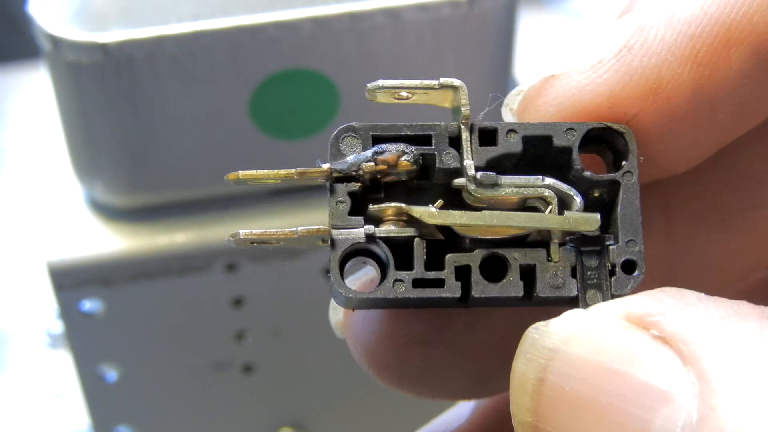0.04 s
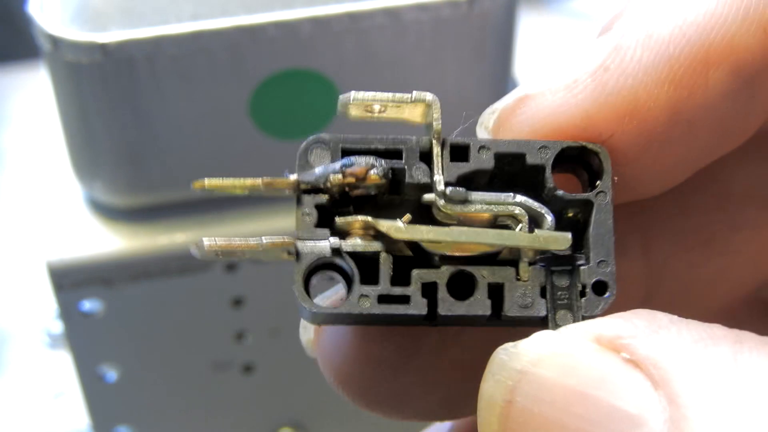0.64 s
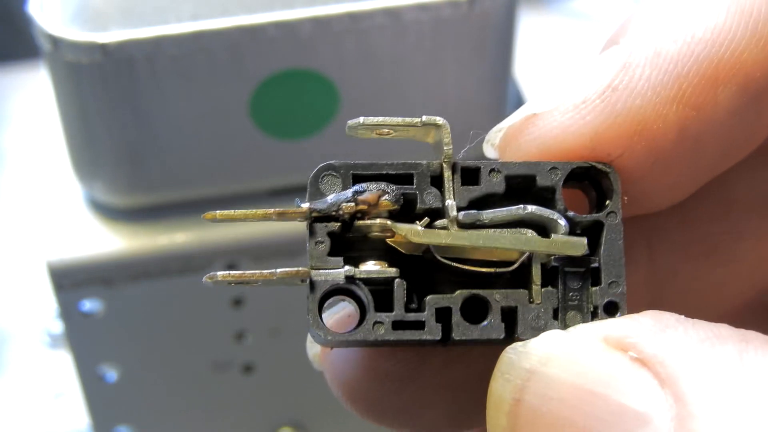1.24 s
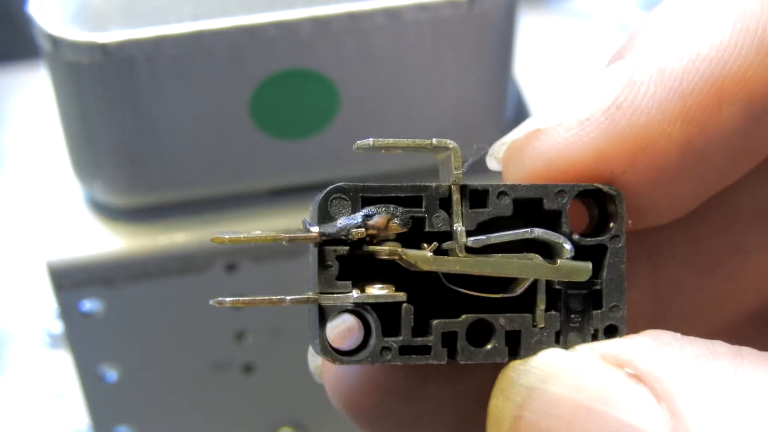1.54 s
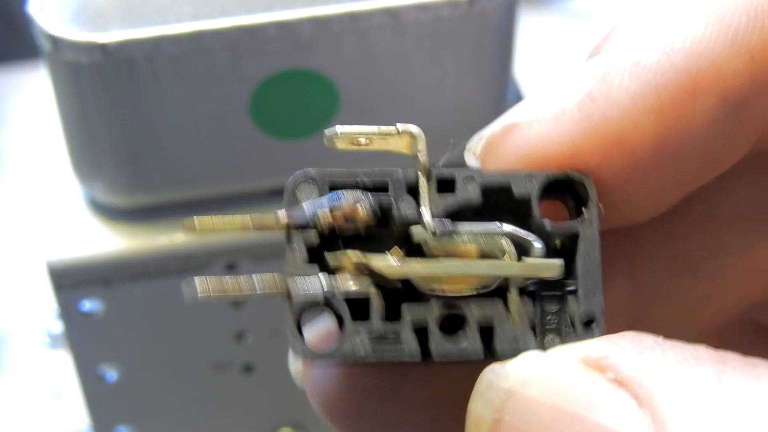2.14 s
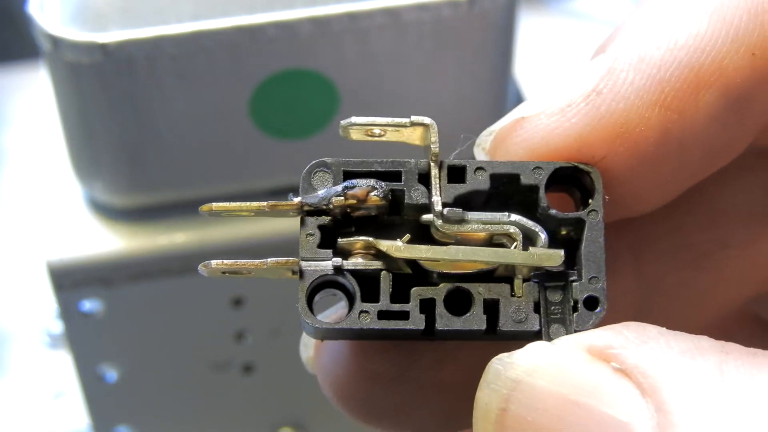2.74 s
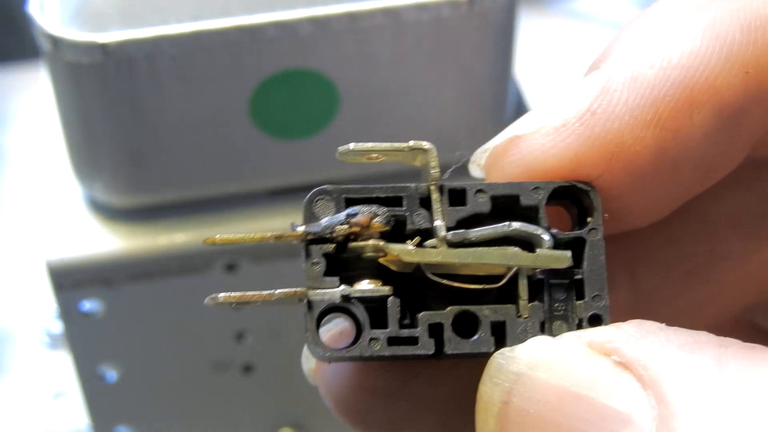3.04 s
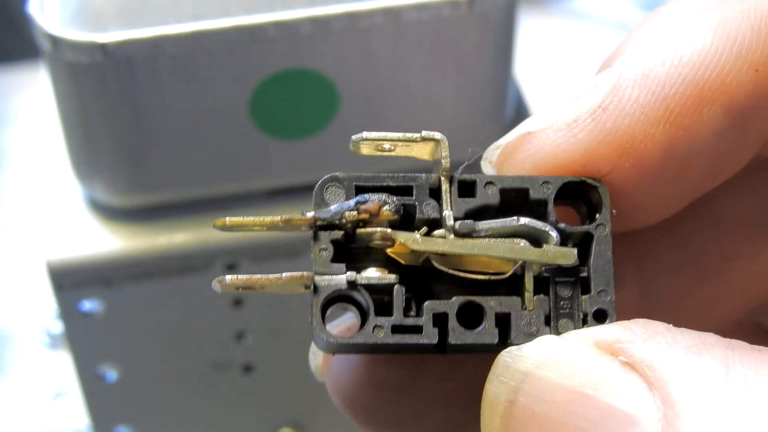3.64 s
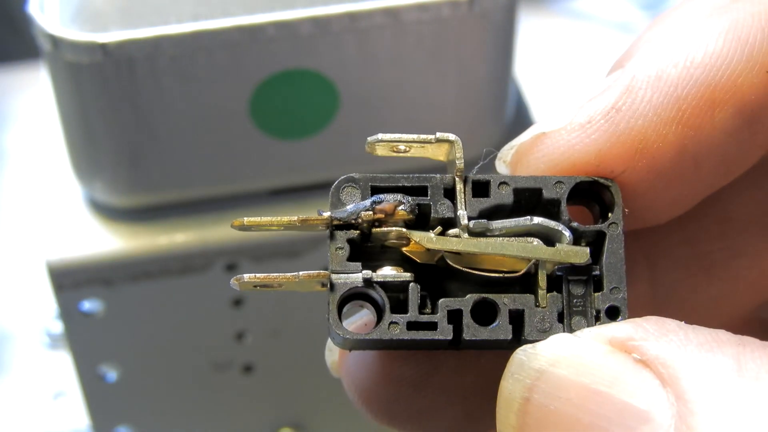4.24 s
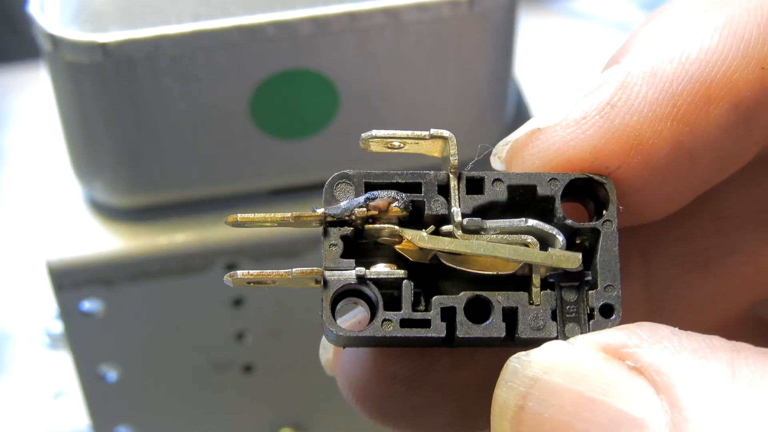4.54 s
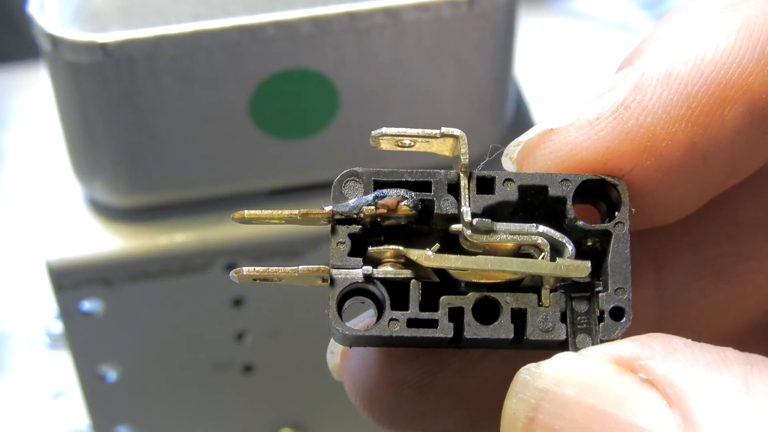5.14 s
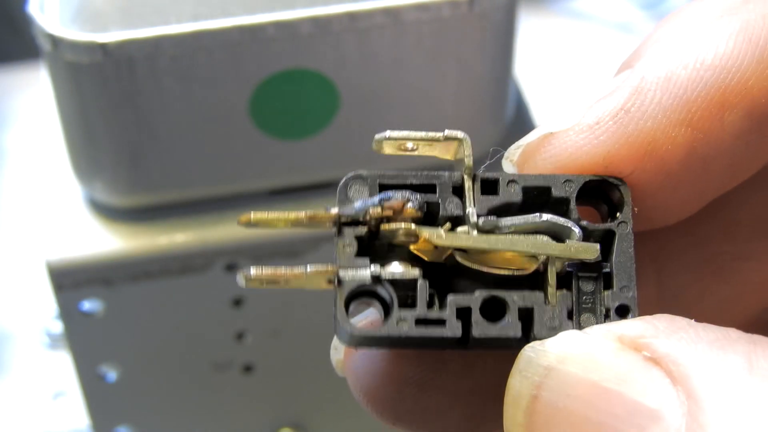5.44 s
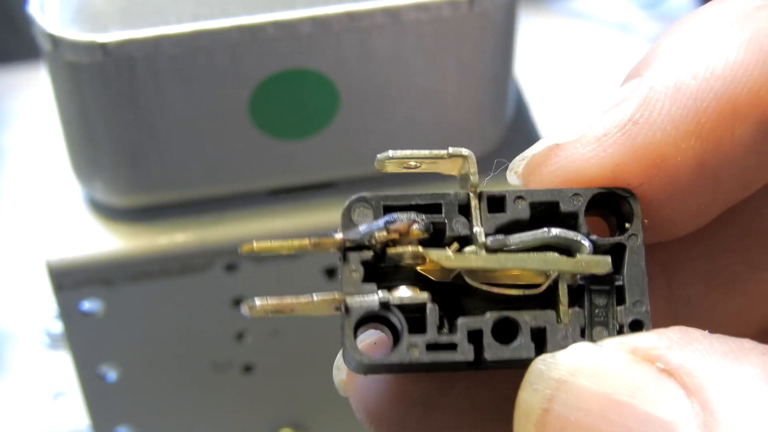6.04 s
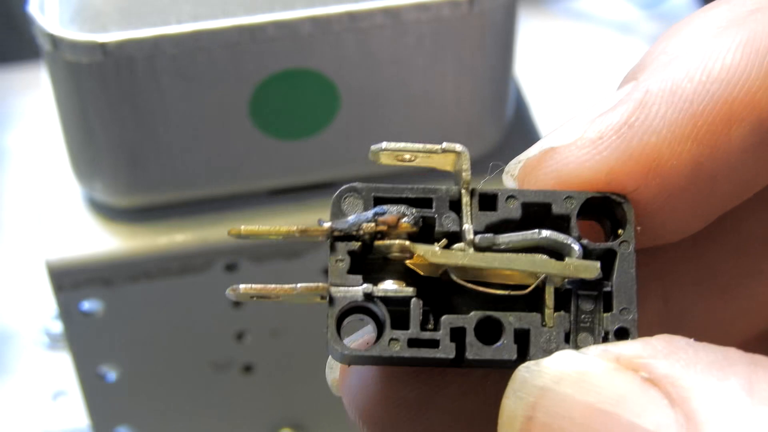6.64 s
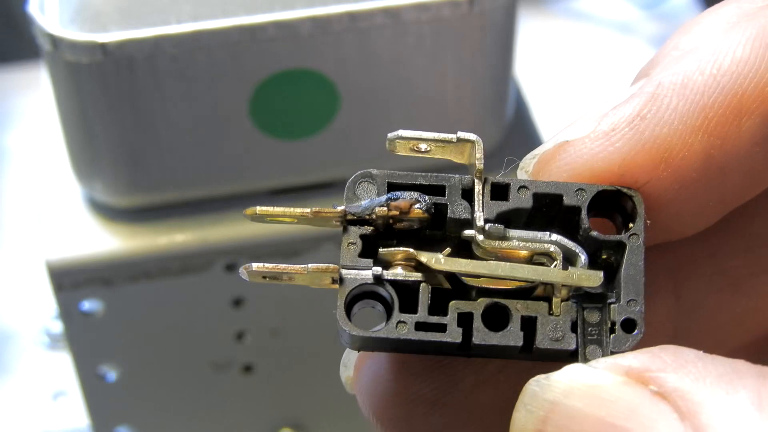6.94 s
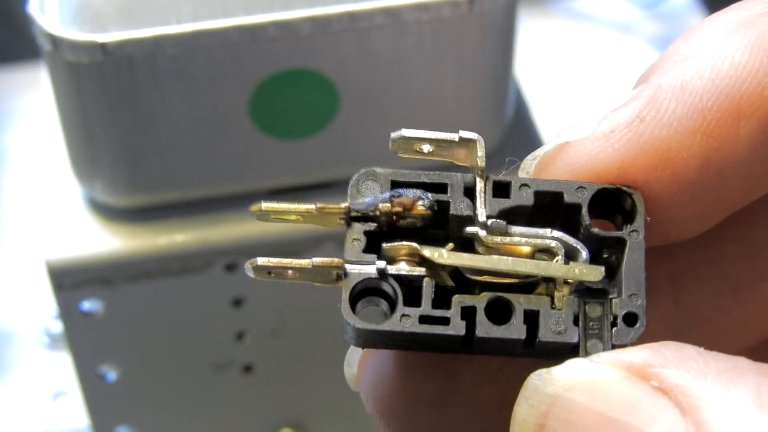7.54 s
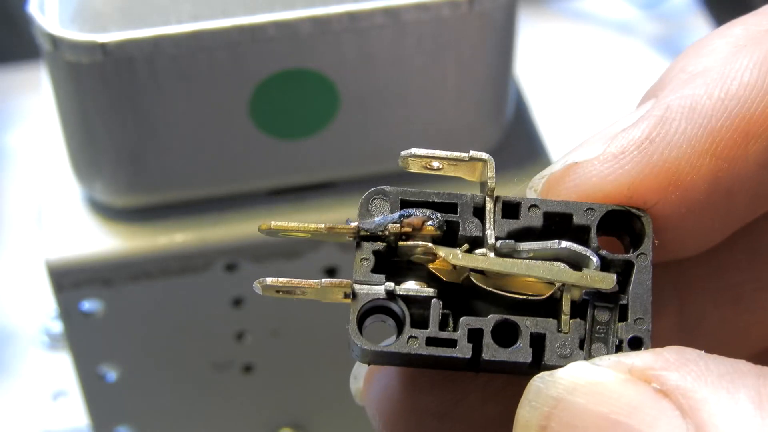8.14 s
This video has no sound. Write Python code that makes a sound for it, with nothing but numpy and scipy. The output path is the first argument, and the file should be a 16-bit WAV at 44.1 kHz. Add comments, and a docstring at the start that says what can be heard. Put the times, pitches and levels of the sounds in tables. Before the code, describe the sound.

A small snap-action switch is pressed and released between finger and thumb, close to the microphone. Sharp, light, metallic clicks come unevenly, about three a second, the presses a little louder than the releases. They pause for over a second midway, then resume. Each has a tiny ring and a short room echo. Underneath is quiet workshop noise with a faint motor hum.

```python
"""A clicking microswitch

An opened microswitch is pressed and released between finger and thumb, close by in a small workshop.
Each time its spring snaps over, the contact hits a stop and bounces, so blade, terminals and case
ring briefly, and the bench and room echo. Underneath are room noise, a soft rustle, a motor's hum
and faint chirps. A fingertip scuffs the case once, and the held switch gives one thin squeak."""
import sys
import numpy as np
from scipy import signal
from scipy.fft import rfft, irfft, next_fast_len
from scipy.io import wavfile

SR = 44100
rng = np.random.default_rng(int(sys.argv[2]) if len(sys.argv) > 2 else 0)


def to_wav(s):
    """Save 16-bit WAV."""
    ch = np.atleast_2d(s).T  # columns
    pcm = np.round(np.clip(ch, -1, 1) * 32767)  # PCM
    wavfile.write(sys.argv[1], SR, pcm.astype(np.int16))


N = 371322


def from_db(db):
    """Turns decibels into a number to multiply a sound by."""
    return 10 ** (np.asarray(db) / 20)


def rms_one(x):
    """Scales a sound to an average (rms) level of 1."""
    return x / np.sqrt(np.mean(x ** 2) + 1e-20)


def energy_one(x):
    """Scales a stereo sound so its two channels average an energy of 1."""
    return x / np.sqrt(np.sum(x ** 2) / 2 + 1e-20)


def at_hz(points, hz):
    """Reads between the rows of a (pitch_hz, value) table, with octaves evenly spaced."""
    known_hz, values = np.transpose(points)
    return np.interp(np.log(np.maximum(hz, 1)), np.log(known_hz), values)


def add(out, sound, start_s):
    """Mixes a stereo sound in at its start time."""
    start = round(start_s * SR)
    first, last = max(start, 0), min(start + sound.shape[1], N)
    out[:, first:last] += sound[:, first - start:last - start]


def drift(rate_hz):
    """Wanders by about 1 either way, reaching a new random value rate_hz times a second."""
    points = rng.standard_normal(int(rate_hz * N / SR) + 2)
    return np.interp(np.arange(N) * rate_hz / SR, np.arange(len(points)), points)


def spread_noise(colour):
    """Noise from all around: left and right are partly alike in the bass, unrelated in the treble."""
    # how alike the two sides are: pitch_hz, likeness (0 to 1)
    likeness = [(60, 0.28), (150, 0.51), (380, 0.53), (950, 0.47), (2380, 0.18), (5980, 0.01),
                (15000, 0.04)]
    # how much louder the left side is: pitch_hz, left_db
    balance = [(60, 3.2), (240, 0.5), (950, 1.5), (3770, 0.5), (15000, 0.5)]
    size = next_fast_len(N)
    hz = np.fft.rfftfreq(size, 1 / SR)
    middle, side = rfft(rng.standard_normal((2, size)))
    alike, left_right = at_hz(likeness, hz), np.array([[1], [-1]])
    stereo = np.sqrt(1 + alike) * middle + np.sqrt(1 - alike) * side * left_right
    gain = from_db(at_hz(colour, hz) + left_right * at_hz(balance, hz) / 2)
    return rms_one(irfft(stereo * gain, size)[:, :N])


def room_noise(level_db):
    """The steady, mostly low noise of the workshop."""
    # tone colour of the room noise: pitch_hz, relative_db
    colour = [(20, -8), (35, -16), (60, -11.5), (90, -3.5), (150, -5.5), (200, -6.5), (260, -16.5),
              (400, -23.5), (1000, -29), (2000, -29.5), (4000, -27), (8400, -30.5), (12000, -37),
              (16000, -40.5)]
    return from_db(level_db) * spread_noise(colour)


def rustle(level_db, swell_db, flutter_db):
    """Soft mid-range noise that comes and goes, with a fast flutter on top."""
    # tone colour of the rustle: pitch_hz, relative_db
    colour = [(150, -21), (300, 0.5), (600, -2.5), (1100, -6), (1600, -8.5), (3000, -25), (8000, -50.5)]
    change_db = swell_db * np.tanh(drift(rate_hz=14)) + flutter_db * drift(rate_hz=76)
    return from_db(level_db + change_db) * spread_noise(colour)


def motor_hum():
    """A running motor gives steady tones that waver a little in level."""
    # the motor's tones: pitch_hz, level_db, waver_db
    tones = [(58.8, -56.5, 1.5), (179, -69, 3.5), (1055, -78.5, 2.5), (1112, -81.5, 2.5)]
    t, out = np.arange(N) / SR, 0
    for pitch_hz, level_db, waver_db in tones:
        level = from_db(level_db + waver_db * drift(rate_hz=9))
        out = out + level * np.sin(2 * np.pi * (pitch_hz * t + rng.random()))
    return np.sqrt(2) * out


def bearing_chirps(turn_s, uneven_db, waver_hz, slip_s):
    """Two faint, unsteady chirps take turns, like a dry fan bearing."""
    # the chirps of one turn: first_peak_s, pitch_hz, level_db, width_s
    chirps = [(0.038, 2045, -67, .012), (0.1, 1520, -70.5, .012)]
    t, out = np.arange(N) / SR + slip_s * drift(rate_hz=5), 0
    for first_peak_s, pitch_hz, level_db, width_s in chirps:
        from_peak_s = (t - first_peak_s + turn_s / 2) % turn_s - turn_s / 2
        swell = np.exp(-(from_peak_s / width_s) ** 2 / 2)
        level = from_db(level_db + uneven_db * drift(rate_hz=7.9)) * swell
        cycles = np.cumsum(pitch_hz + waver_hz * drift(rate_hz=160)) / SR
        # the far source reaches left and right out of step
        offset = 0.09 * np.array([drift(rate_hz=6.4), drift(rate_hz=3.4)])
        out = out + np.sqrt(2) * level * np.sin(2 * np.pi * (cycles + offset))
    return out


def finger_scuff(peak_s, level_db, fade_s):
    """A fingertip shifts on the case: one brief, soft scuff of skin on plastic."""
    # tone colour of the scuff: pitch_hz, relative_db
    colour = [(300, -15), (1500, -2), (3000, 2), (5000, -2), (7000, -9.5), (12000, -25)]
    swell = np.exp(-np.abs(np.arange(N) / SR - peak_s) / fade_s)
    return from_db(level_db) * swell * spread_noise(colour)


def squeak(waver_hz):
    """One thin, gliding, slightly unsteady tone while the switch is held down."""
    # the path of the squeak: time_s, pitch_hz, level_db
    glide = [(6.65, 7600, -81), (6.715, 8650, -66.5), (6.765, 9150, -78), (6.835, 8250, -76),
             (6.90, 8150, -73), (6.94, 7850, -75.5), (6.985, 8300, -72.5), (7.025, 7470, -77)]
    time_s, pitch_hz, level_db = np.transpose(glide)
    t = np.arange(N) / SR
    pitch = np.interp(t, time_s, pitch_hz) + waver_hz * drift(rate_hz=200)
    level = np.interp(t, time_s, from_db(level_db), left=0, right=0)
    return level * np.sqrt(2) * np.sin(2 * np.pi * np.cumsum(pitch) / SR)


def near_echoes(size=2048):
    """The direct path of a click, then a few echoes from bench and boxes."""
    # echoes from nearby surfaces: delay_s, level_db
    echoes = [(.0045, -10), (.0077, -15.5), (0.0136, -25.5), (0.023, -27)]
    response = np.zeros((2, size))
    response[:, 0] = 1
    for delay_s, level_db in echoes:
        arrival_s = np.abs(delay_s + rng.normal(0, 0.00014, 2))   # the hand never holds quite still
        response[[0, 1], (arrival_s * SR).astype(int)] += from_db(level_db)
    return response


def room_tail(gain_db=-14.5, build_s=.004, size=16384):
    """The room returns a click from all sides, blurred into noise; the treble dies first."""
    # tone colour of the tail: pitch_hz, relative_db
    colour = [(1200, -32), (2000, -25), (3300, -24), (4200, -12.5), (5000, -13), (6000, -5.5), (7000, -5),
              (8000, -7.5), (8800, -2), (9400, -6), (10200, -7.5), (12000, -12.5), (14000, -7),
              (15500, -28)]
    # time the room takes to fade by 60 dB: pitch_hz, fade_s
    fades = [(1500, 0.46), (5000, 0.22), (9000, 0.23), (15000, 0.018)]
    t, hz = np.arange(size) / SR, np.fft.rfftfreq(size, 1 / SR)
    noise = rfft(rng.standard_normal((2, size))) * from_db(at_hz(colour, hz))
    edges_hz = np.linspace(800, 16800, 13)
    tail = 0
    for low, high in zip(edges_hz, edges_hz[1:]):
        band = irfft(noise * ((hz >= low) & (hz < high)))
        tail = tail + band * from_db(-60 * t / at_hz(fades, np.sqrt(low * high)))
    return from_db(gain_db) * energy_one(tail * (1 - np.exp(-t / build_s)))


def ringing_parts(tones, spread_db=0.94, longest_s=.022, low_cut_hz=1400, size=2048):
    """Blade, terminals and case ring after one hit; each tone falls 60 dB in its fade time."""
    pitch_hz, level_db, fade_s = np.transpose(tones)[:, :, None]
    t = np.arange(size) / SR
    fade_s = np.minimum(fade_s, longest_s)   # the fingers damp the case
    pitch_hz = pitch_hz * (1 + .004 * rng.standard_normal(pitch_hz.shape))   # spring tension varies
    rings = from_db(level_db - 60 * t / fade_s) * np.sin(2 * np.pi * pitch_hz * t)
    signs = (-1) ** np.arange(len(tones))
    stereo_strengths = signs * from_db(spread_db * rng.standard_normal((2, len(tones))))
    # the small case gives off little low sound
    low_cut = signal.butter(4, low_cut_hz, "high", fs=SR, output="sos")
    return signal.sosfilt(low_cut, stereo_strengths @ rings)


def snap(tones, bounces, knock_db, ring_db, spring_db, treble_db, spring_hz=9120, size=4096):
    """One snap: the first hit and its uneven bounces set the parts ringing; the grip colours them."""
    hz = np.fft.rfftfreq(size, 1 / SR)
    hits = 1
    for delay_s, level_db in bounces:
        uneven_delay_s = delay_s * np.exp(.18 * rng.normal())
        hits = hits + from_db(level_db) * np.exp(-2j * np.pi * hz * uneven_delay_s)
    # tone colour from the grip: pitch_hz, boost_db
    grip = [(2900, knock_db), (3900, ring_db), (6000, ring_db), (7200, 0), (9500, 0), (11000, treble_db)]
    colour_db = at_hz(grip, hz) + spring_db * np.exp(-((hz - spring_hz) / 420) ** 2)
    sound = irfft(rfft(ringing_parts(tones), size) * hits * from_db(colour_db))
    return energy_one(sound[:, :size // 2])


def switch_clicks(snaps, tones, bounces, room_db, linger_db, left_db=3):
    """A run of snaps, held a little to the left, each with its echoes and room tail."""
    out = np.zeros((2, N))
    for start_s, level_db, *colour_db in snaps:
        sound = from_db(level_db) * snap(tones, bounces, *colour_db)
        direct = sound * from_db([[left_db / 2], [-left_db / 2]])
        add(out, signal.fftconvolve(direct, near_echoes(), axes=1), start_s)
        add(out, from_db(level_db + room_db) * room_tail(), start_s)
        # the strongest metal tones linger in the room as a faint ring
        add(out, from_db(linger_db) * signal.fftconvolve(sound, room_tail(), axes=1), start_s)
    return out


def releases():
    """The finger lets go: the contact falls back and bounces lightly."""
    # each release: start_s, level_db, knock_db, ring_db, spring_db, treble_db
    snaps = [(0.1974, 7.4, -3, -3, -4, 1), (0.8232, 6.2, -0.5, -3.2, -3.5, 1.5),
             (1.4771, 6.6, 0, -0.5, -1.5, 1.5), (1.9625, 6.7, -1, -0.5, -3.5, 0),
             (2.6514, 6, 1.5, -1, 3, 2.5), (3.3927, 6.9, 0.5, -1, 4.5, 3), (4.8873, 6.8, -8, -4, -1.5, -2),
             (5.6758, 7, -1, -0.5, 5.5, 3), (6.3134, 6.7, 2.5, -1.5, 2.5, 1),
             (7.0606, 7.3, 0, -3.5, 3, 1.5), (7.721, 6.2, -0.5, 1.5, 5, 4), (8.0351, 8.2, -3.5, -4, -1, -6)]
    # what rings as the contact falls back: pitch_hz, relative_db, fade_s
    tones = [(1932, -34.5, 0.011), (3160, -33, 0.006), (3480, -36, 0.018), (3882, -23, 0.01),
             (4370, -17.5, 0.0059), (5230, -17.5, 0.0082), (5880, -22, 0.019), (6540, -12.5, 0.0047),
             (6840, -16, 0.013), (7300, -20, 0.02), (7380, -7.5, 0.0056), (8160, -12.5, 0.0082),
             (8630, -13.5, 0.0129), (9020, -10, 0.012), (9550, -14, 0.006), (10100, -22.5, 0.012),
             (10650, -20, 0.007), (11614, -17.5, 0.0045), (12600, -20.5, 0.00224), (15400, -31.5, 0.0029)]
    # bounces after the first hit: delay_s, relative_db
    bounces = [(.0007, -8.5), (.0015, -9), (.0026, -16.5)]
    return switch_clicks(snaps, tones, bounces, room_db=-1.3, linger_db=-12.5)


def presses():
    """The finger pushes: the spring throws the contact onto the far stop, where it bounces harder."""
    # each press: start_s, level_db, knock_db, ring_db, spring_db, treble_db
    snaps = [(-0.022, 6, 0, -3, 0, -3), (0.6455, 9.5, 1.7, -2, -11, -1.5), (1.2325, 8.5, 2.5, 2, -4.5, 1),
             (1.7052, 10.5, 2, 2, -1.5, 0), (2.3496, 9.5, 1, 1.9, 1, 2), (3.0879, 10.5, 1, -1.5, 0.5, 2),
             (3.5932, 11.5, -1, -2.1, -1, -2), (5.4386, 9, -1.5, -1.5, -11, -2), (6.1367, 11, 4.5, 2, 7, 4),
             (6.4246, 9.5, 1.5, 0, 3.5, 2), (7.5432, 10, 4, -1, 1.5, -1), (7.8634, 10, 2, -1, 0.5, 2.5),
             (8.1582, 10.5, 1.5, -0.3, -2, -2.5)]
    # what rings at the far stop: pitch_hz, relative_db, fade_s (before the fingers damp it)
    tones = [(1957, -32, 0.013), (2720, -30.5, 0.0071), (3020, -29, 0.0055), (4075, -20, 0.0097),
             (4406, -21, 0.021), (5300, -16.5, 0.01), (6050, -19.5, 0.0093), (6160, -21, 0.0176),
             (6950, -11.5, 0.01), (7210, -16, 0.058), (7630, -7, 0.0087), (8433, -3.5, 0.0083),
             (8587, -9.5, 0.011), (8726, -4.5, 0.013), (9290, -2, 0.0033), (10930, -26.5, 0.016),
             (11000, -29.5, 0.0063), (11700, -17, 0.003), (12800, -26.5, 0.0059), (15060, -24.5, 0.003)]
    # bounces after the first hit: delay_s, relative_db
    bounces = [(.0007, -6), (.0014, -3), (.0026, -12)]
    return switch_clicks(snaps, tones, bounces, room_db=-0.5, linger_db=-13.0)


def scene():
    """The switch over the quiet workshop."""
    clicks = presses() + releases()
    workshop = room_noise(level_db=-52) + rustle(level_db=-64.5, swell_db=5.5, flutter_db=3.0)
    machine = motor_hum() + bearing_chirps(turn_s=.14545, uneven_db=2.6, waver_hz=38, slip_s=0.013)
    handling = squeak(waver_hz=55) + finger_scuff(peak_s=2.203, level_db=-52, fade_s=.008)
    return workshop + machine + handling + clicks


def record(dry):
    """Sound under about 4 kHz arrives a little before the treble, and the very top is cut off."""
    split_hz, lead_s, top_hz = 3950, .0101, 15800
    size = next_fast_len(N + SR // 10)
    hz = np.fft.rfftfreq(size, 1 / SR)
    low_band = 1 / (1 + (hz / split_hz) ** 80)
    early_lows = low_band * np.exp(2j * np.pi * hz * lead_s) + 1 - low_band
    padded = np.pad(dry, ((0, 0), (0, size - N)), mode="reflect")
    shifted = irfft(rfft(padded) * early_lows, size)[:, :N]
    top_cut = signal.ellip(10, .1, 80, top_hz, fs=SR, output="sos")
    return signal.sosfilt(top_cut, shifted)


dry = scene()
out = record(dry)
to_wav(out)
```